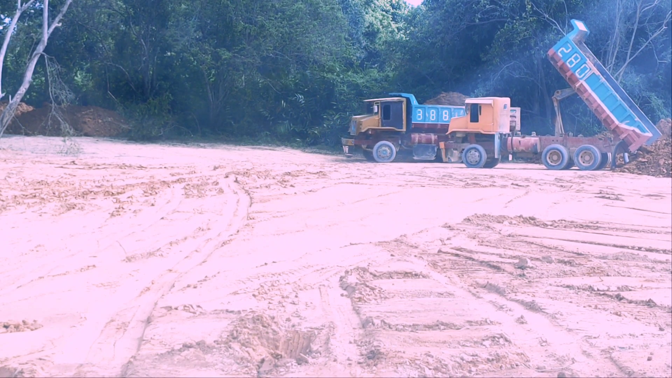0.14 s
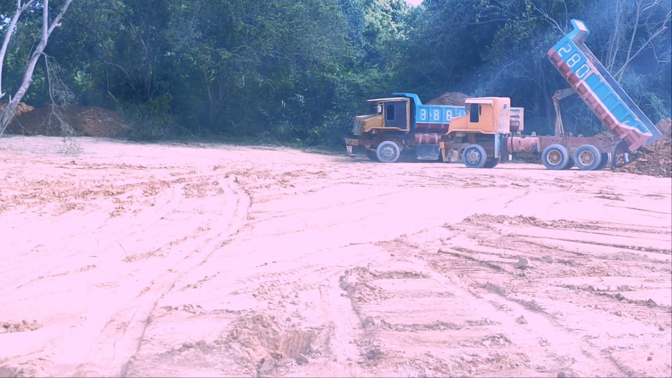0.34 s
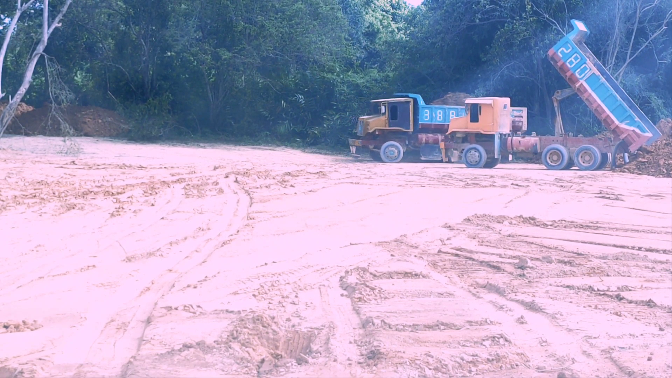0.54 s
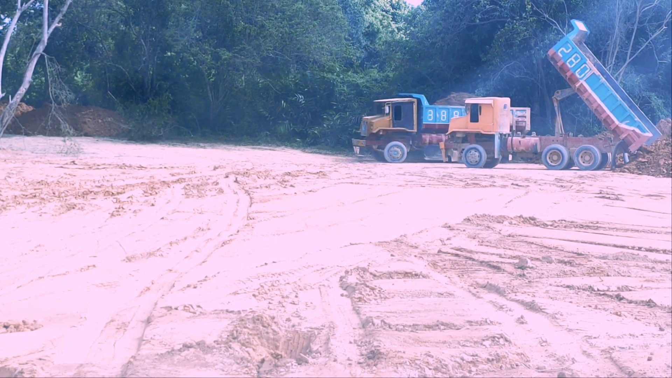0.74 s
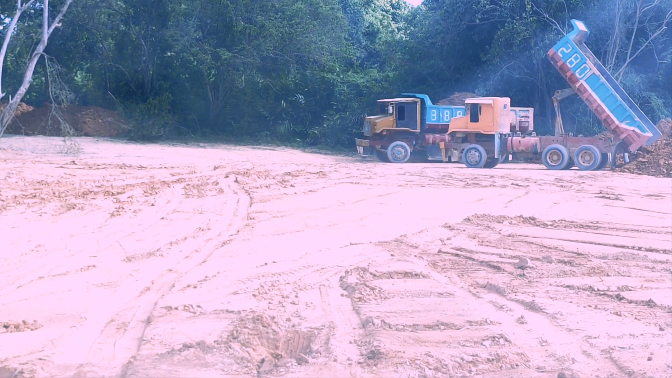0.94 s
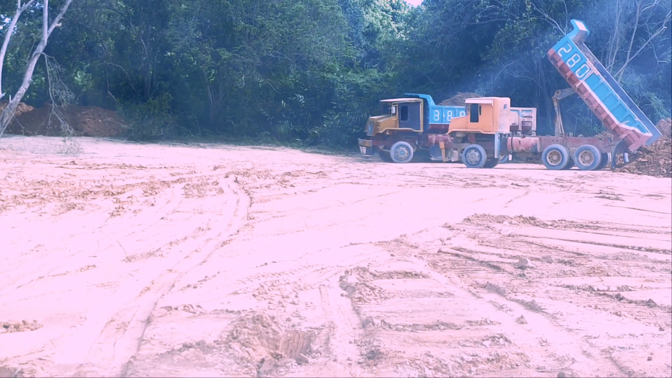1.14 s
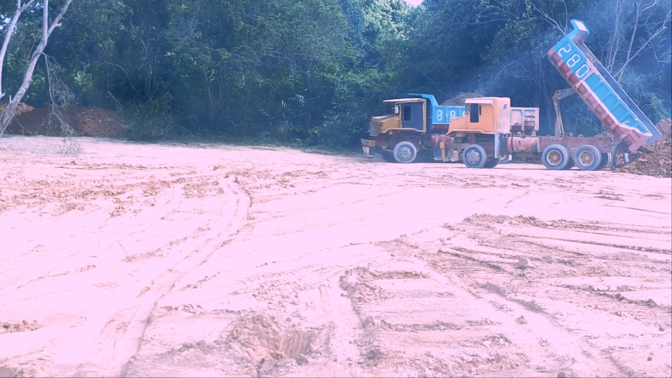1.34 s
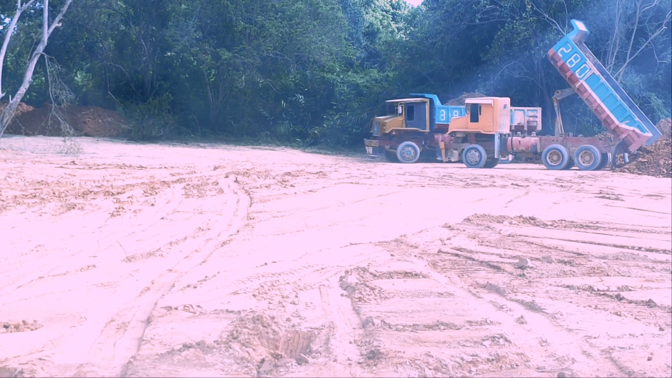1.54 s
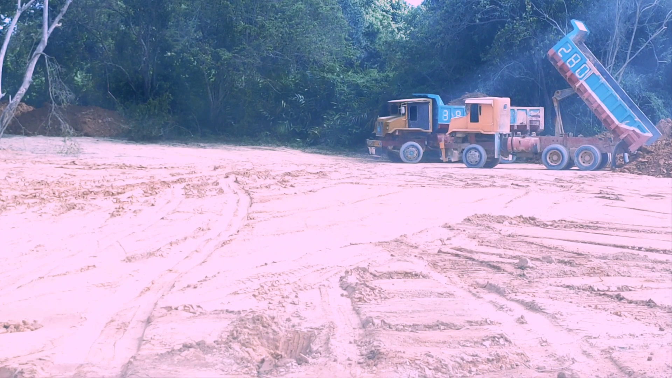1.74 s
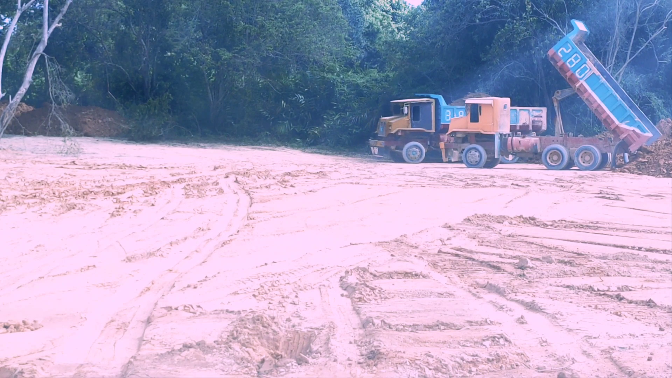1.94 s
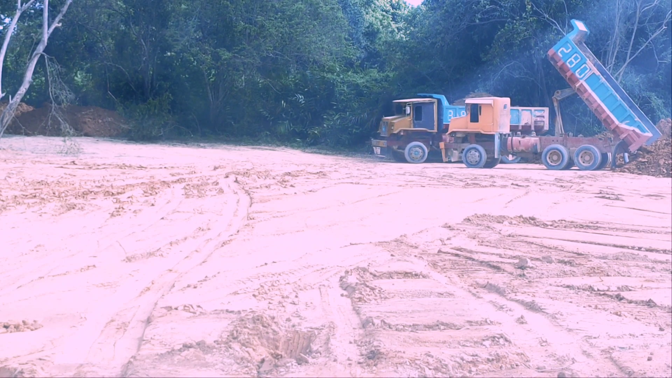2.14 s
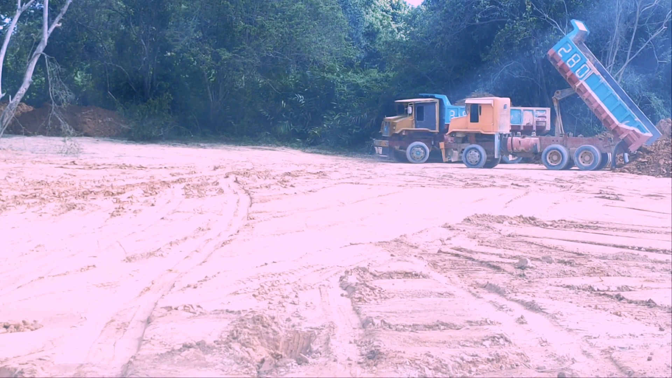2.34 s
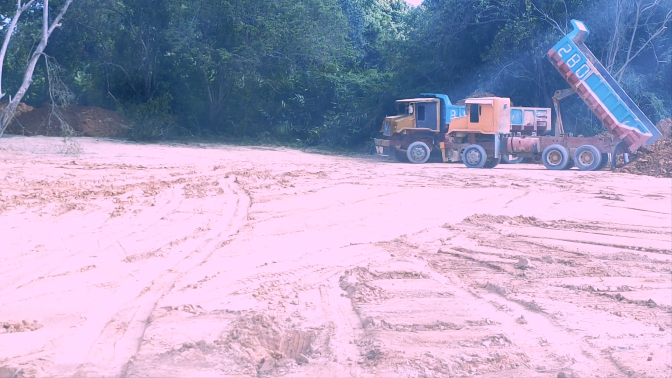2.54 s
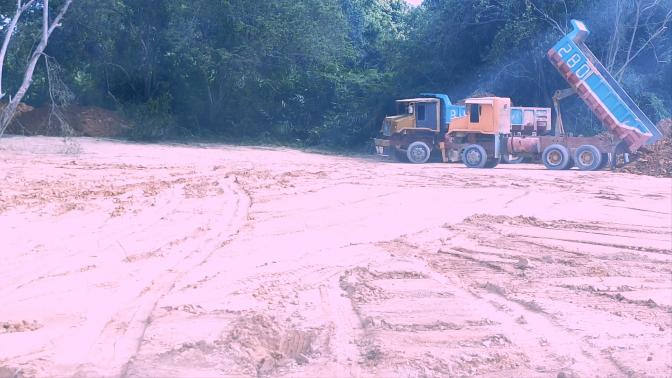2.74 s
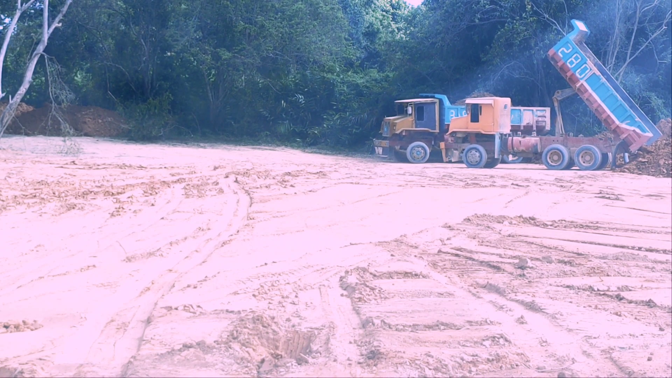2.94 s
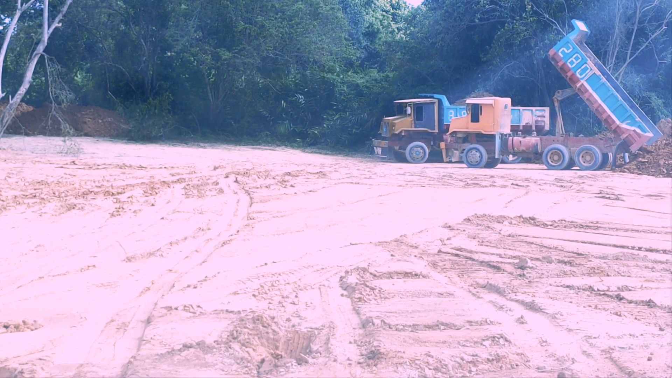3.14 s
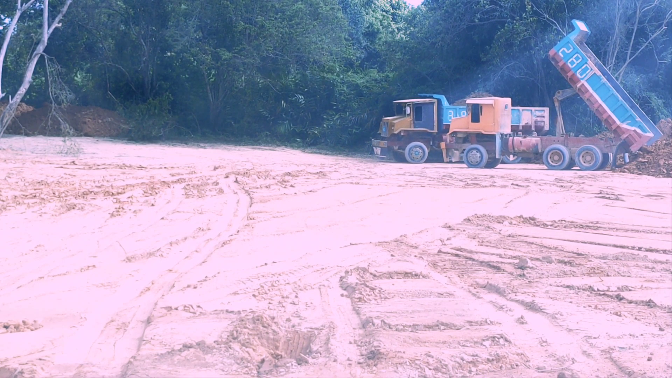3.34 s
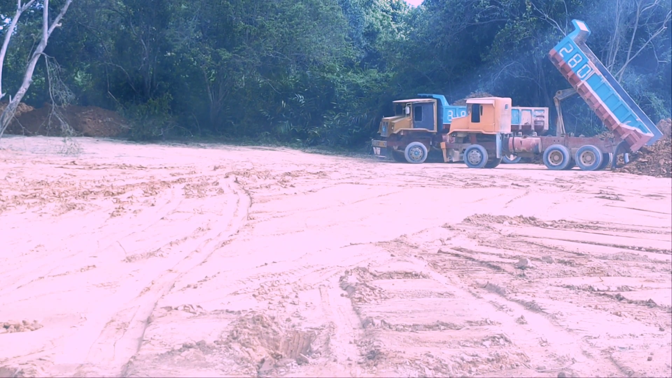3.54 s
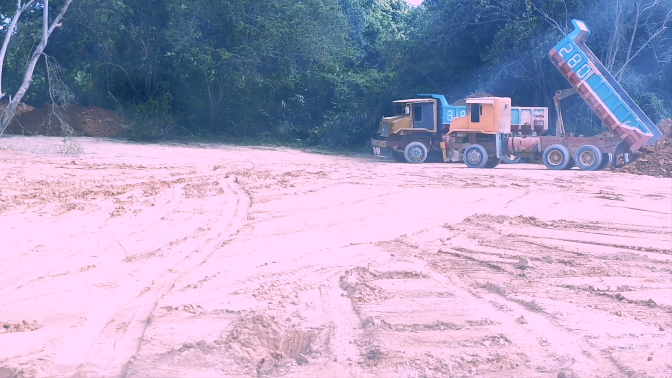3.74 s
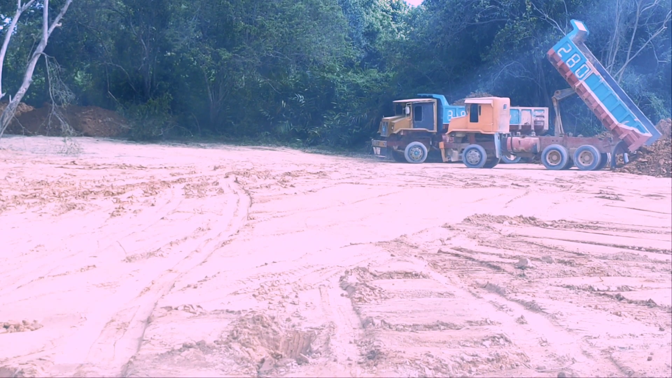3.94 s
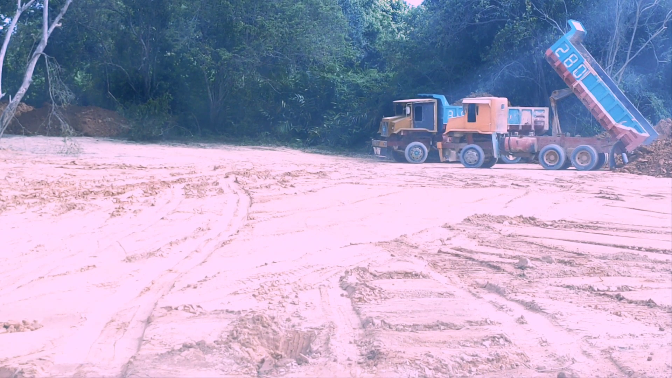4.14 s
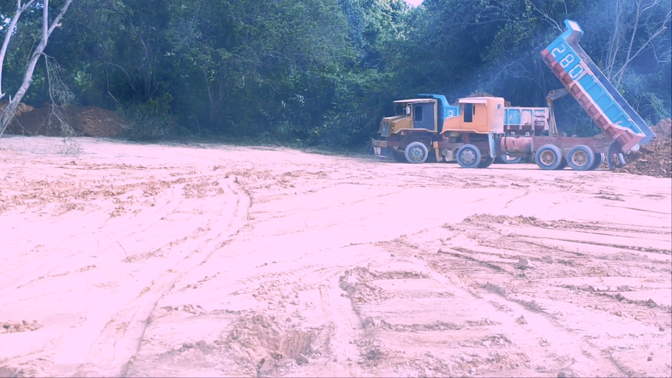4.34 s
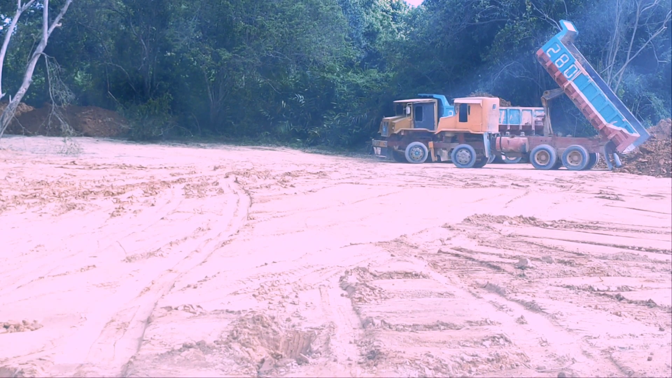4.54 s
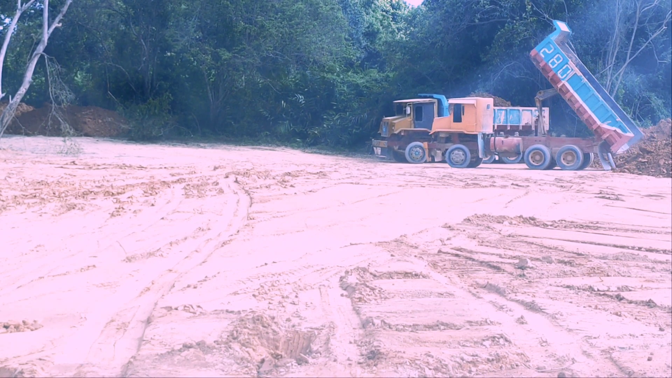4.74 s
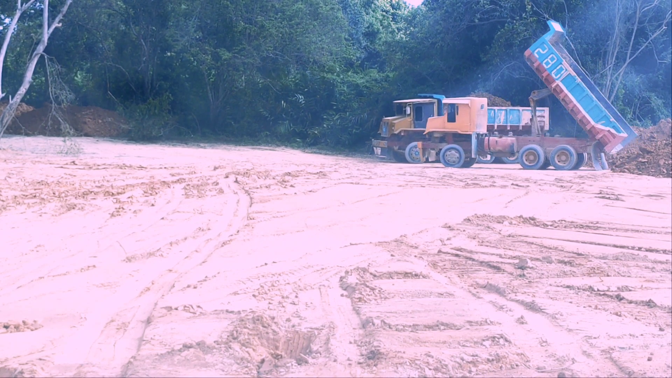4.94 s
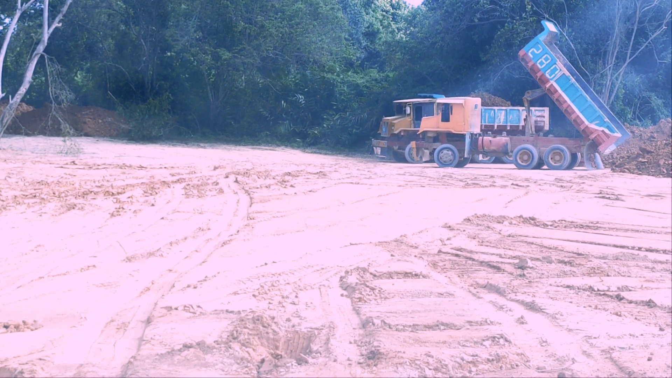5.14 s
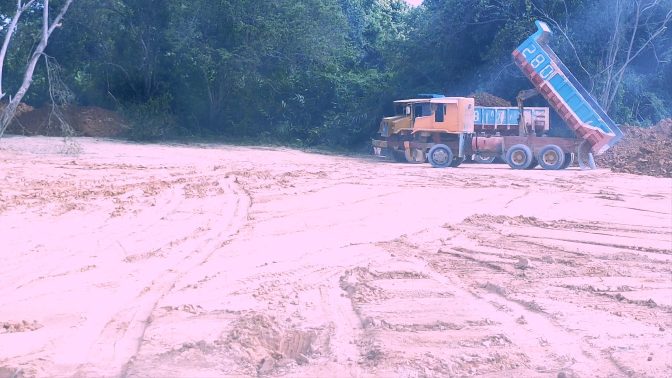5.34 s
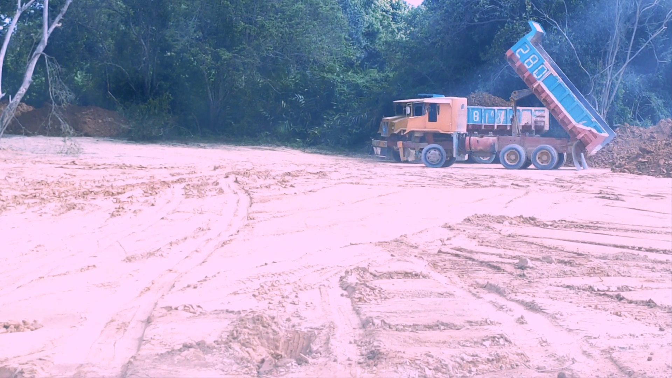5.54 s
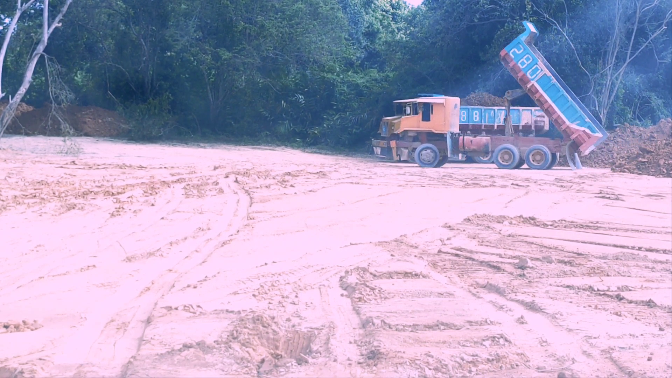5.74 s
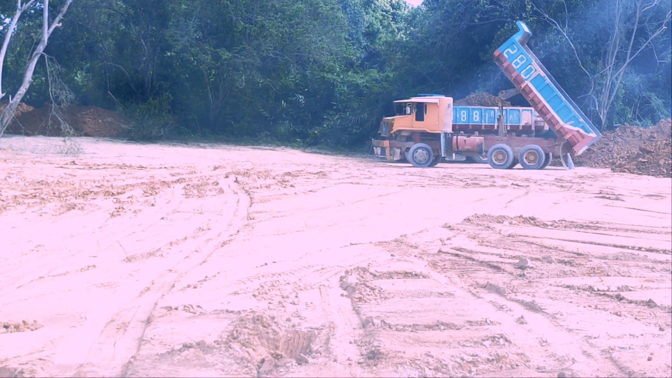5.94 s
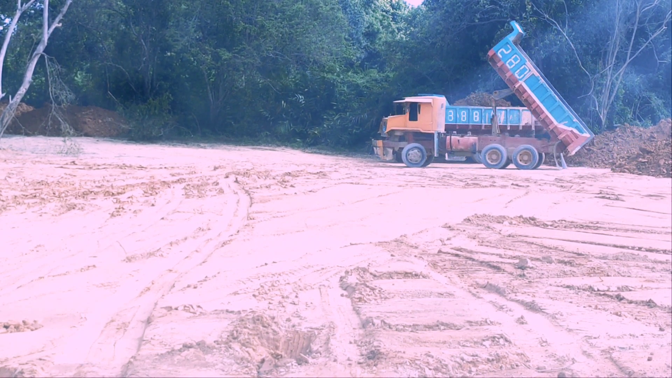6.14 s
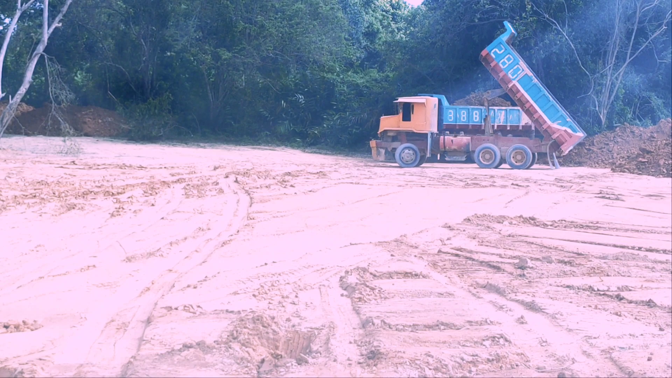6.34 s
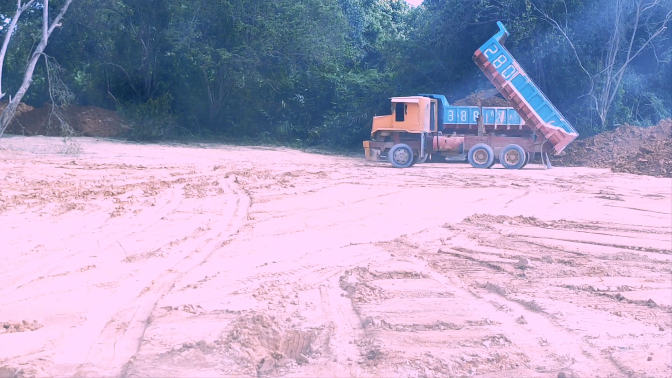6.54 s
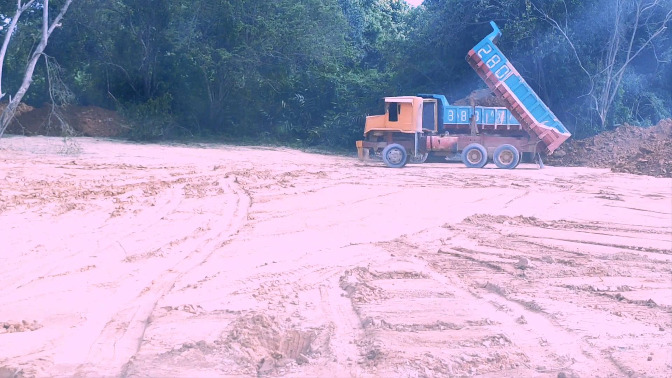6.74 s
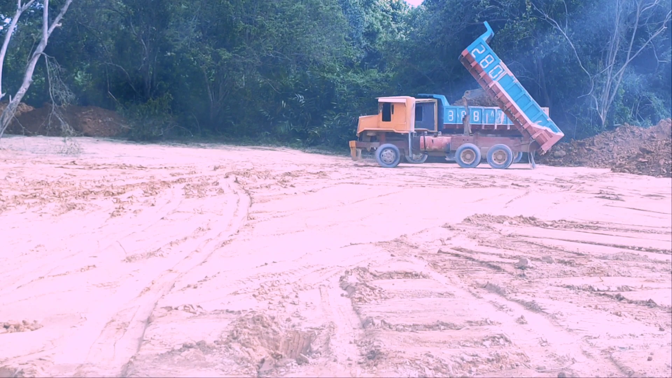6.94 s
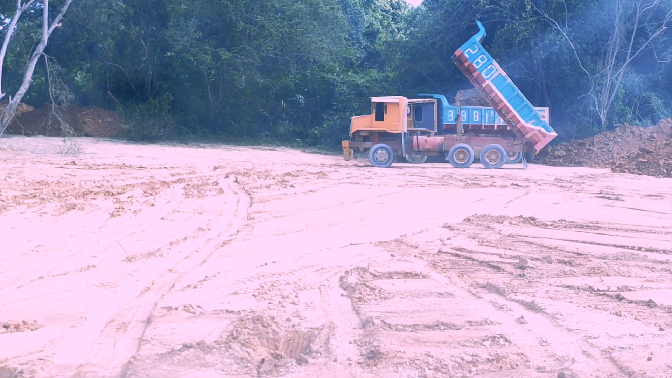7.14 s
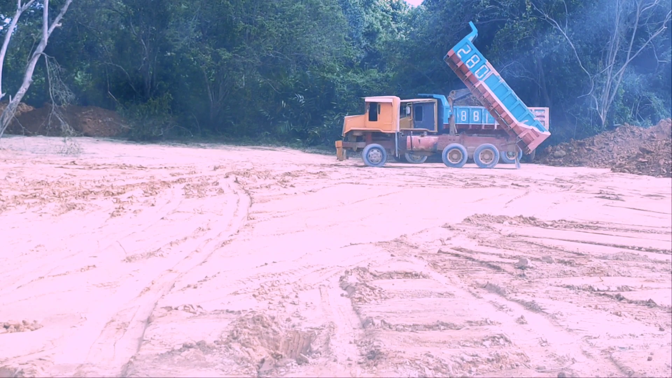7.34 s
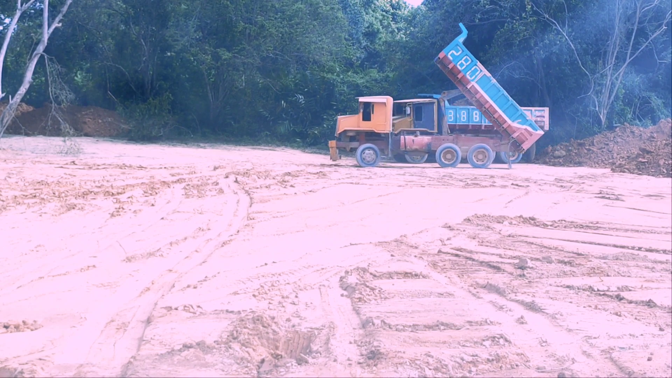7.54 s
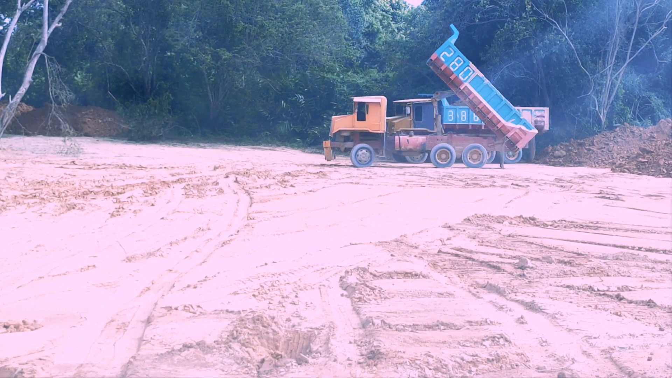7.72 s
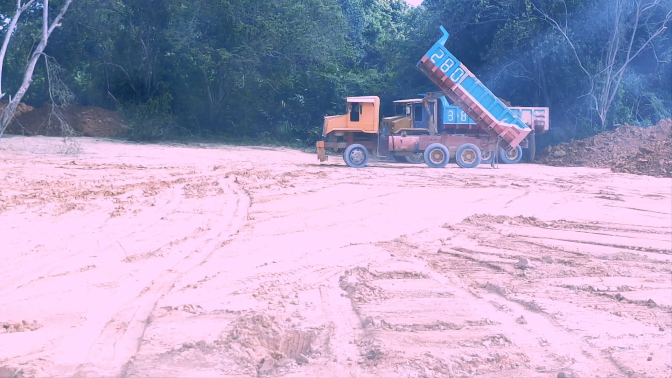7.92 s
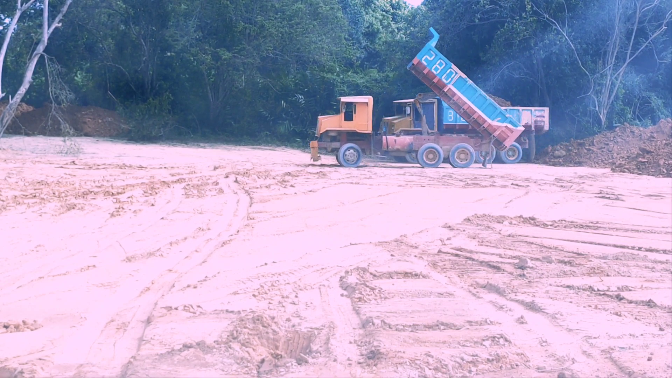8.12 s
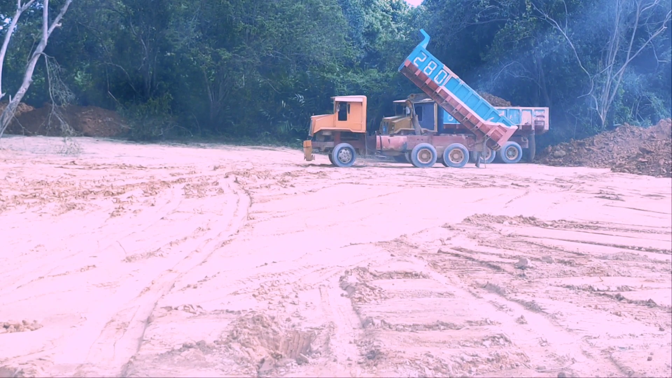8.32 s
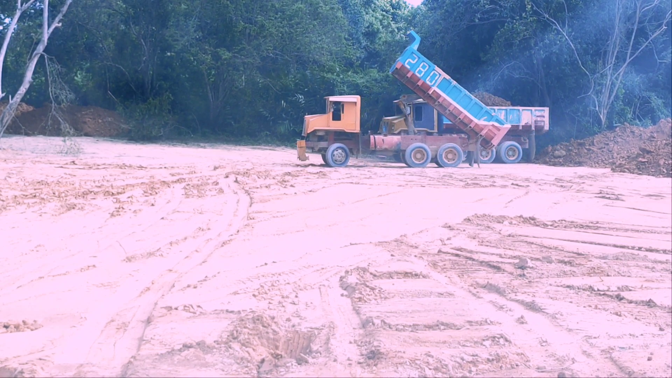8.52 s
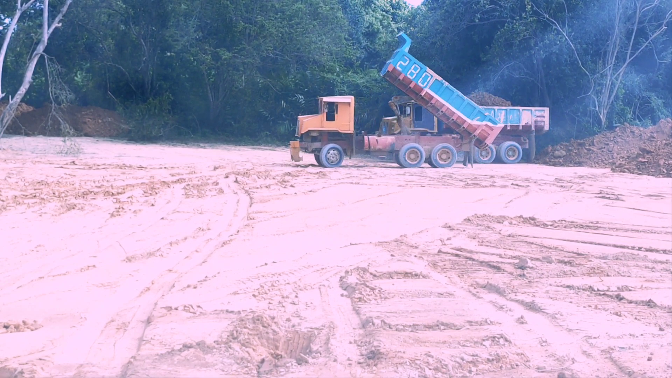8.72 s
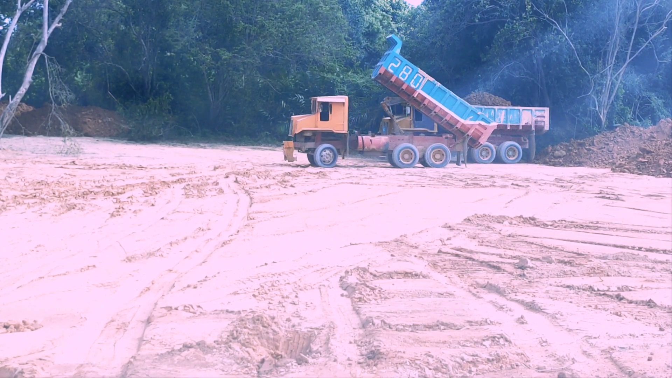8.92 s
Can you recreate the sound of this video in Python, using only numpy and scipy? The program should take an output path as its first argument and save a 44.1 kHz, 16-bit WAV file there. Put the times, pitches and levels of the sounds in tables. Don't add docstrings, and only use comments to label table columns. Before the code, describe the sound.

Outdoors at an earthworks site, two far diesel engines idle with a slow beating throb over broad exhaust and fan noise. After about five seconds a truck revs under load and grows steadily stronger to the end. Right at the microphone, a strap scrapes and cracks, fingers knock a hollow plastic body, and a small metal ring jingles, mostly early; the hardest knocks come around seven seconds.

```python
import sys
import numpy as np
from scipy import signal
from scipy.fft import rfft, irfft, next_fast_len
from scipy.io import wavfile
from scipy.ndimage import uniform_filter1d, map_coordinates

SR = 44100
rng = np.random.default_rng(int(sys.argv[2]) if len(sys.argv) > 2 else 0)


def how_loud(loudness_db):
    steps = np.asarray(loudness_db, float) / 20
    return 10 ** steps


def store_wav(level_fs):
    pcm = np.round(np.clip(np.atleast_2d(level_fs), -1, 1) * 32767)
    wavfile.write(sys.argv[1], SR, pcm.T.astype(np.int16))


N = 400428

# frequency [Hz], density [dB per Hz].
CLOTH = [(1500, -37), (5000, -18), (7000, -1.5), (9300, 3.5), (10800, -1), (12500, -1.5), (15200, 0.5),
         (16000, -4.5)]
# centre [Hz], width [Hz], level [dB].
CAVITY = [(7460, 1080, 4), (5900, 150, -12)]
# centre [Hz], width [Hz], level [dB].
CASING = [(3410, 320, 6), (5030, 500, 4), (6450, 500, 5)]
# centre [Hz], width [Hz], level [dB].
SHELL = [(646, 340, -8.5), (2420, 284, 6), (3490, 230, -1), (5050, 580, -24.5), (5510, 100, -3.5)]


def unit(x):
    return x / np.sqrt(np.mean(x ** 2) + 1e-20)


def along(points, hz):
    f, value = np.transpose(points)
    return np.interp(np.log(hz + 1), np.log(f + 1), value)


def curves(rows):
    s, *columns = np.transpose(rows)
    return [np.interp(np.arange(N) / SR, s, column) for column in columns]


def wobble(knots_hz):
    coarse = np.arange(0, N + 16, 16)
    knots = rng.standard_normal(int(N * knots_hz / SR) + 4)
    return np.interp(np.arange(N), coarse, map_coordinates(knots, [coarse * knots_hz / SR]))


def filtered(x, response):
    m = next_fast_len(N + SR // 2)
    return irfft(rfft(x, m) * response(np.fft.rfftfreq(m, 1 / SR)), m)[..., :N]


def shaped(x, spectrum):
    hz = np.linspace(0, SR / 2, 4096)
    mean_gain = np.sqrt(np.mean(how_loud(along(spectrum, hz)) ** 2))
    return filtered(x, lambda f: how_loud(along(spectrum, f))) / mean_gain


def modes(table):
    def response(f):
        total = 0
        for k, (centre, width, db) in enumerate(table):
            damping = 1j * f * width
            total = total + (-1) ** k * how_loud(db) * damping / (centre * centre - f * f + damping)
        return total
    return response


def tuned(hz, centre_hz, width_hz):
    return -20 * np.log10(1 + (2 * (hz - centre_hz) / width_hz) ** 2)


def sides(db):
    return how_loud(np.multiply.outer([.5, -.5], db))


def rush(spectrum):
    # frequency [Hz], left-right likeness [-1 to 1].
    alike = [(60, 0.94), (99, 0.62), (160, 0.54), (270, 0.98), (450, 0.39), (740, 0.47), (1220, -0.86),
             (2010, 0.32), (3330, -0.12), (5500, -0.22), (9080, 0.83), (15000, -0.48)]

    def split(hz):
        turn = np.arccos(np.clip(along(alike, hz), -1, 1)) / 2
        return how_loud(along(spectrum, hz)) * [np.cos(turn), np.sin(turn)]
    mid, side = filtered(rng.standard_normal((2, N)), split)
    return unit(np.array([mid + side, mid - side]))


def orders(hz, table, start, sway_db, lean):
    turns = start + np.cumsum(hz) / SR
    total = 0
    for k, db in table:
        level = how_loud(db + sway_db * wobble(3)) * np.sqrt(2)
        total = total + level * np.cos(2 * np.pi * (k * turns + lean * k * k))
    return total


def add(track, s, db, t60, rise, sound):
    t = np.arange(sound.shape[-1]) / SR
    envelope = how_loud(db - 60 * t / max(t60, .004)) * (1 - np.exp(-t / rise))
    track[..., round(s * SR):][..., :len(t)] += envelope * sound


def blow(snap, scatter):
    n = SR // 20
    return snap * (np.arange(n) == 20) + scatter * rng.standard_normal((2, n))


def patchy(x, depth_db):
    z = signal.stft(x, nperseg=256)[2]
    field = uniform_filter1d(rng.standard_normal(z.shape[1:]), size=4, axis=0)
    field = uniform_filter1d(field, size=16, axis=1)
    return signal.istft(z * how_loud(depth_db * unit(field)), nperseg=256)[1][:, :N]


def drone():
    # time [s], exhaust level [dB], fan level [dB].
    drone_levels = [(0.0, -45.5, -56), (1.41, -46.5, -56), (9.08, -45.5, -56)]
    # frequency [Hz], density [dB per Hz].
    exhaust_spectrum = [(22, -48), (30, 0.5), (45, 3.5), (70, 5), (100, 0.5), (150, -5), (200, -1.5),
                        (230, -3), (270, -5), (330, -9.5), (370, -12.5), (600, -47.5)]
    fan_spectrum = [(190, -81), (330, -7), (345, -11.5), (366, -9.5), (474, -2), (526, -10), (579, -5),
                    (724, -14.5), (883, -7), (963, -13.5), (1090, -13), (1200, -18), (1280, -13),
                    (1600, -21.5), (2600, -26), (3380, -30), (5720, -120)]
    air_spectrum = [(880, -13), (1500, 15), (1740, 19.5), (2880, -5.5), (3550, 13.5), (6890, 6.5),
                    (8080, 3.5), (14200, -77), (16000, -32)]
    exhaust_db, fan_db = curves(drone_levels)
    exhaust = how_loud(exhaust_db + 3.5 + 1.1 * wobble(4.4)) * rush(exhaust_spectrum)
    fans = how_loud(fan_db + 5.0 + 0.45 * wobble(5.4)) * rush(fan_spectrum)
    air = how_loud(-64.5 + 0.13 * wobble(7.1)) * rush(air_spectrum)
    return exhaust + fans + air


def idlers():
    # time [s], firing rate [Hz].
    speed_a = [(0, 29.951), (2, 30.017), (4, 29.999), (6.5, 30.0), (9.08, 30.037)]
    speed_b = [(0, 28.48), (4, 28.38), (9.08, 28.53)]
    # multiple of the firing rate, level [dB].
    orders_a = [(1, -44), (2, -38.5), (3, -59), (4, -61), (6, -58.5)]
    orders_b = [(2, -72.5), (3, -96), (4, -52.5), (5, -59), (6, -56.5), (7, -54), (12, -61.5), (16, -66.5)]
    a = orders(curves(speed_a)[0], orders_a, start=.974, sway_db=0.73, lean=.054)
    b = orders(curves(speed_b)[0], orders_b, start=0.3, sway_db=0.0, lean=.03)
    return a + b


def easing_engine():
    # time [s], pitch [Hz], level [dB].
    blip = [
        (3.8, 46, -71),
        (4.1, 43.74, -43),
        (4.5, 42.6, -48),
        (5.2, 42, -55),
        (5.6, 41, -74),
    ]
    hz, db = curves(blip)
    return orders(hz, [(0.94, db)], start=0.57, sway_db=-4.5, lean=0)


def truck():
    # time [s], engine cycle rate [Hz], firing level [dB].
    revs = [(1.6, 4.812, -64.3), (3.3, 5.64, -55.6), (3.7, 5.616, -57.1), (4.15, 6.122, -61.4),
            (4.5, 6.223, -52.7), (5.4, 7.082, -37.0), (5.7, 7.119, -40.9), (6, 7.881, -40.6),
            (6.3, 7.329, -39.6), (6.75, 8.057, -38.1), (7.08, 7.487, -38.0), (7.44, 7.519, -38.6),
            (7.68, 7.979, -35.8), (7.8, 8.125, -32.6), (8.15, 7.612, -31.3), (8.4, 8.403, -31.8),
            (8.78, 8.397, -29.6), (9.07, 9.137, -29.2)]
    # multiple of the cycle rate, level [dB over order 11].
    uneven_orders = [(6, -5), (7, -3.5), (9, -15), (10, -1), (11, 2), (13, -4.5), (16, -9), (19, -38)]
    hz, firing_db = curves(revs)
    full_load_db, light_load_db, strain_from_db = -31, -39, -30.6

    boom_db = -34 + 3.1 * np.minimum(firing_db - full_load_db, 0)
    boom_db = boom_db + tuned(5 * hz, centre_hz=41.2, width_hz=7.7)
    strain_db = 5 * np.minimum(firing_db - strain_from_db, 0)
    main_orders = [(5, boom_db), (8, firing_db + 0.19), (11, -40 + strain_db)]
    main = orders(hz, main_orders, start=.164, sway_db=1.0, lean=.0208)

    uneven_db = -47.5 + tuned(11 * hz, centre_hz=80.2, width_hz=37)
    uneven_db = uneven_db + 0.57 * np.minimum(firing_db - light_load_db, 0)
    uneven = how_loud(uneven_db) * orders(hz, uneven_orders, start=0.1234, sway_db=5.5, lean=0.021)

    stack_hz, stack_width_hz, stack_from_hz = 198, 6.99, 8.35
    stack_db = -45 + strain_db / 2 + 25 * np.minimum(hz - stack_from_hz, 0) + 2.7 * wobble(9.7)
    turns = np.cumsum(stack_hz + stack_width_hz * wobble(14) / 2) / SR
    hum = how_loud(stack_db) * np.sqrt(2) * np.sin(2 * np.pi * turns)

    fade_in = np.clip(np.arange(N) / SR - 1.2, 0, 1)
    return fade_in * (main + uneven + hum)


def knocks():
    # time [s], peak [dB], thud [dB], upper mode [dB].
    taps = [(0.1526, -47, -11, -3), (0.178, -53, 14.5, -2), (0.2404, -57, -2, -3), (1.384, -46, -10, 0),
            (2.0114, -40, -7, -8), (2.0574, -43, 4, -11), (3.6404, -47, -5, 12), (4.4242, -49.5, -11, 7),
            (5.286, -46, 7, -10), (5.374, -44.5, -10, -6), (6.4093, -59, -12, -7), (6.602, -42.5, -6, 10),
            (6.707, -36, -11, -10), (6.7261, -42, -7, -10), (6.7511, -24, -28, -6), (6.792, -33.5, 3.5, 3),
            (7.0074, -55, -6, 3), (7.196, -37, -8, 0), (7.5577, -30, -5, -4), (7.7323, -29, -9.5, 0)]
    drive, palm = np.zeros((3, N + SR)), np.zeros((2, N + SR))
    for s, db, thud_db, upper_db in taps:
        contact = blow(snap=6.6, scatter=0.68)[[0, 1, 0]]
        add(drive, s, db + 8, .035, .0005, how_loud([[0], [thud_db], [upper_db]]) * contact)
    add(palm, 2.058, -40.5 + 26, .04, .001, blow(snap=7.1, scatter=0.71))

    tap = filtered(drive[0, :N], modes(SHELL[1:2])) - filtered(drive[2, :N], modes(SHELL[2:3]))
    thud = how_loud(12.5) * filtered(drive[1, :N], modes(SHELL[:1]))
    thud = thud + filtered(palm[0, :N], modes([(480, 130, 0)]))
    tap_stereo = np.array([np.roll(tap, 8), tap])
    return tap_stereo * sides(-9.5)[:, None] + thud


def jingle():
    # time [s], peak [dB], upper mode [dB], pitch as it hangs [Hz].
    shakes = [(0.153, -58, -22, 8700), (0.1787, -32, -28, 8540), (0.3635, -47.5, -30, 8530),
              (0.4323, -41, -28, 8700), (0.4735, -38.5, -20, 8600), (0.7961, -44, -21, 8700),
              (1.306, -45, -32, 8700), (1.88, -48, -30, 8700), (2.061, -40.5, -26, 8630),
              (2.135, -42.5, -27, 8600), (2.271, -34.5, -36, 8700), (2.298, -36.5, -28, 8700),
              (2.3425, -26.5, -23, 8720), (2.3715, -30, -24, 8700), (2.386, -31, -21, 8670),
              (2.4322, -27, -18, 8700), (2.466, -36.5, -19, 8640), (2.72, -37, -26, 8550),
              (2.827, -40, -25, 9350), (2.8413, -37, -18, 8900), (2.866, -34, -22, 8640),
              (2.905, -37, -15, 8700), (3.696, -54, -25, 8800), (3.7393, -42.5, -27, 8600),
              (4.6346, -28, -44, 8310), (4.758, -51.5, -35, 8420), (5.0181, -55.5, -30, 9030),
              (5.288, -55, -30, 8400), (5.422, -43.5, -28, 8620)]
    # start [s], length [s], level [dB], pitch [Hz].
    chatters = [
        (2.255, 0.22, -43, 8700),
        (2.835, 0.12, -43, 8850),
    ]
    # frequency [Hz], level [dB].
    ring = [(8300, -9), (8441, -3), (8613, 4), (8759, 5), (8787, 5), (8958, -2), (9250, -7), (9577, -9),
            (9900, -11)]
    ring_top = [(13700, 2), (13640, -10), (13790, -12)]
    free_hz, t60_s, contact_gap_s = 8700, 0.05, .017
    t = np.arange(SR // 8) / SR

    def bell(table, shift):
        total = 0
        for hz, db in table:
            level = how_loud(db + 3.1 * rng.standard_normal())
            mode_hz = hz * shift * (1 + .0012 * rng.standard_normal())
            total = total + level * np.sin(2 * np.pi * (mode_hz * t + rng.random()))
        return total

    strikes = list(shakes)
    for s, length_s, db, hz in chatters:
        for contact_s in np.arange(s, s + length_s, contact_gap_s):
            strike_s = contact_s + 0.0033 * rng.standard_normal()
            strikes.append((strike_s, db - 2.5 + 2.4 * rng.standard_normal(), -27, hz))

    low, top = np.zeros(N + SR), np.zeros(N + SR)
    for s, db, top_db, hz in strikes:
        add(low, s, db - 5.5, t60_s, .0005, bell(ring, hz / free_hz))
        add(top, s, db + top_db + 4, 1.4 * t60_s, .0008, bell(ring_top, 1))
    low_stereo = np.array([low, np.roll(low, 24)])[:, :N]
    return low_stereo * sides(-0.22)[:, None] + top[:N] * sides(-15)[:, None]


def ticks():
    # time [s], peak [dB], left minus right [dB], casing [dB].
    cracks = [(0.1535, -32, -8, -6), (0.1787, -26, -2, -11), (0.181, -27, 2, -16), (0.2396, -38, -8, 2),
              (0.3924, -35, 12, -27), (0.432, -32, -16, -18), (0.473, -35, -4, -14), (0.784, -38, -14, -9),
              (0.8036, -33, -7, -14), (0.843, -41, -16, -12), (0.9343, -43, -11, -12),
              (1.2222, -36, -8, -12), (1.318, -32, -6, -12), (1.3697, -32.5, -3, -10),
              (1.7789, -51, -5, -1), (1.8383, -42, -15, -6), (2.0574, -48, -4, -10), (2.0644, -32, -8, -16),
              (2.2333, -48, -5.5, -10), (2.3436, -43, -2, -12), (2.4334, -42, -11, -15),
              (2.7224, -44, -7, -16), (2.735, -36, -11, -12), (2.828, -40, -2, -12), (3.6381, -40, 6, -5),
              (4.6354, -41, -5, -1), (4.6914, -55, -4, -3), (5.3296, -42, -7, 5), (5.375, -38, -8, -3),
              (5.3818, -26, -9, -18), (6.752, -22, -5, -6), (6.79, -24.5, -10, 1.5),
              (6.9322, -28.5, -7, 3.5), (7.007, -41, -2, -4), (7.197, -24, -6, -3), (7.5564, -54, -8, -14),
              (7.7323, -36.5, -11, 2.5), (8.7394, -67, -3, -5)]
    drive = np.zeros((4, N + SR))
    for s, db, pan_db, casing_db in cracks:
        crack = sides(pan_db)[:, None] * blow(snap=3.3, scatter=0.93)
        add(drive, s, db - 6.5, .016, .0004, np.vstack([crack, how_loud(casing_db) * crack]))
    bright, casing = drive[:2, :N], drive[2:, :N]
    cavity = filtered(bright, modes(CAVITY)) * how_loud([[-9], [1.5]])
    return shaped(bright, CLOTH) + cavity + how_loud(6.5) * filtered(casing, modes(CASING))


def strokes():
    # start [s], length [s], level [dB], dullness [dB].
    scrapes = [(0.214, 0.037, -50, -1), (0.386, 0.12, -63, 5), (0.772, 0.087, -66, 15.5),
               (1.214, 0.062, -59.5, -1), (1.278, 0.068, -60.5, 5), (1.352, 0.063, -59.5, -4),
               (1.604, 0.034, -68, 11), (1.843, 0.059, -58, 0), (2.049, 0.061, -56, 2.5),
               (2.115, 0.094, -65.5, 9.5), (2.319, 0.042, -47, -20), (2.717, 0.045, -53, -18),
               (2.824, 0.13, -54, -7), (3.595, 0.11, -68.5, 3), (4.846, 0.077, -68, -2),
               (5.412, 0.1, -64, 9), (5.525, 0.09, -66, 11.5), (6.404, 0.059, -48.5, -0.5),
               (6.455, 0.075, -65.5, 14.5), (6.591, .075, -58, 1), (6.757, 0.066, -48.5, 6.5),
               (6.827, 0.067, -48.5, 6.5), (6.918, 0.057, -43.5, 1.5), (6.975, 0.041, -44.5, 4),
               (7.136, 0.11, -55, 8.5), (7.307, 0.12, -71, 20.5), (8.003, 0.082, -58, -15),
               (8.199, .028, -56, -8), (8.238, 0.073, -61.5, -20)]
    # start [s], length [s], start level [dB], end level [dB].
    drags = [(0.0, 0.27, -58, -71), (0.252, 0.13, -75, -74), (0.498, 0.34, -79, -80),
             (1.007, 0.24, -61.5, -75), (1.4, 0.63, -75.5, -75), (1.895, .15, -89, -65),
             (2.225, 0.24, -60, -58), (2.477, 0.35, -68.5, -69), (2.91, 0.228, -74.5, -66),
             (3.147, 0.54, -62.5, -67.5), (3.774, 0.22, -73, -62), (3.985, 0.79, -75, -83),
             (4.395, 0.344, -71.5, -75.5), (5.045, 0.33, -69.5, -65), (5.602, 0.37, -74, -70),
             (6.217, 0.23, -94, -61), (6.67, 0.095, -73, -52), (7.554, 0.16, -84, -62),
             (7.716, 0.21, -57.5, -60), (7.902, 0.17, -57, -62.5)]
    swell_db, grip_s, lift_s = -1.5, .012, .014
    creep_body_db, creep_dull_db, creep_edge_s = 5.5, 9.5, 0.039

    def share(body_db, dull_db):
        return how_loud([[0], [body_db], [0.75 * dull_db + 1]])

    rows = []
    for s, length_s, db, dull_db in scrapes:
        rows.append((s, length_s, db - swell_db, db + swell_db, dull_db, dull_db, grip_s, lift_s))
    for row in drags:
        rows.append((*row, creep_body_db, creep_dull_db, creep_edge_s, creep_edge_s))

    t = np.arange(N) / SR
    press = how_loud(-75) * share(6.5, 6.5) * np.ones(N)
    for s, length_s, start_db, end_db, body_db, dull_db, rise_s, fall_s in rows:
        at = slice(max(round((s - rise_s) * SR), 0), round((s + length_s + fall_s) * SR))
        u = t[at] - s
        edges = np.minimum(u / rise_s + .5, (length_s - u) / fall_s + .5)
        edges = np.clip(edges, 0, 1) ** 2
        level = how_loud(start_db + (end_db - start_db) * u / length_s)
        press[:, at] += share(body_db, dull_db) * edges * level
    return press


def rubbing():
    # frequency [Hz], density [dB per Hz].
    cloth_low = [(900, -19.5), (1600, -5.5), (2400, 4), (3400, -2.5), (5500, 4), (8000, -19)]
    roughness = how_loud(2.4 * wobble(350) + 1.1 * wobble(25))
    grain = unit(roughness * patchy(rng.standard_normal((2, N)), depth_db=2.0))
    drive, low, hollow = strokes()[:, None] * how_loud(2.0) * grain * sides(-4.0)[:, None]
    low = low * how_loud(-6.0)
    rustle = shaped(drive, CLOTH)
    dull = how_loud(-0.5) * shaped(low, cloth_low)
    body = how_loud(-2.0) * filtered(low, modes(CASING[:2] + SHELL[4:]))
    cavity = filtered(hollow * how_loud(-7.0), modes(CAVITY)) * how_loud([[-3], [9]])
    return rustle + dull + body + cavity


def scene():
    # frequency [Hz], left minus right [dB].
    tilt = [(60, -1.0), (130, 1.5), (290, -1.5), (640, 1.5), (1410, -1.5), (3100, -2), (6820, -4.5),
            (15000, 10)]
    moving = truck() + easing_engine()
    far = idlers() + moving * sides(-0.7)[:, None] + drone()
    far = filtered(far, lambda hz: sides(along(tilt, hz)))
    return far + rubbing() + ticks() + knocks() + jingle()


def camera(x, weak, uneven_db, sharp):
    # frequency [Hz], mask [dB].
    starved = [(750, -50), (1100, -27), (1350, -15), (2100, -8), (3600, -1), (5200, -1), (7300, -6),
               (9500, 2), (11000, 5), (14000, 1), (15600, 8)]
    hop, top_hz = 1024, 15800
    n, k = np.arange(2 * hop), np.arange(hop)
    hz = (k + .5) * SR / (2 * hop)
    window = np.sin(np.pi * (n[:, None] + .5) / (2 * hop))
    basis = window * np.cos(np.pi / hop * np.outer(n + .5 + hop / 2, k + .5))
    padded = np.pad(x, ((0, 0), (2 * hop - 2, 2 * hop - (N - 2) % hop)))
    halves = padded.reshape(2, -1, hop)
    frames = np.concatenate([halves[:, :-1], halves[:, 1:]], axis=2)
    lines = frames @ basis

    bright = np.diff(frames, 2, axis=2, prepend=0, append=0) ** 2
    bright = bright.reshape(2, -1, 16, hop // 8).sum(axis=(0, 3))
    steady = (bright[:, 4:12].max(axis=1) < sharp * np.median(bright, axis=1))[:, None]

    luck = uniform_filter1d(rng.standard_normal(lines.shape[1:]), size=9, axis=1)
    luck = uniform_filter1d(luck, size=3, axis=0)
    mask = weak * uniform_filter1d(lines ** 2, size=110, axis=2) * how_loud(uneven_db * unit(luck)) ** 2
    mask = mask * how_loud(along(starved, hz)) ** 2 * (hz > starved[0][0])
    kept = lines * ((lines ** 2 > mask * steady) & (hz < top_hz))
    back = (kept @ basis.T) * 2 / hop
    joined = back[:, :-1, hop:] + back[:, 1:, :hop]
    return joined.reshape(2, -1)[:, hop - 2:][:, :N]


def top_cut(x):
    return signal.sosfilt(signal.butter(12, 16650, fs=SR, output="sos"), x)


def record(dry):
    mix = camera(dry, weak=.55, uneven_db=9, sharp=7) + .00283
    return top_cut(mix)


dry = scene()
out = record(dry)
store_wav(out)
```